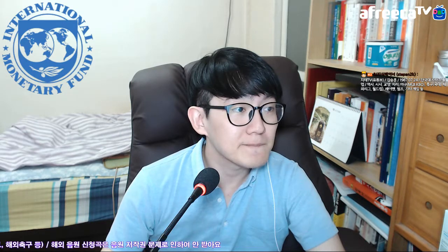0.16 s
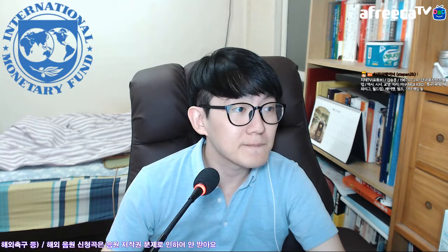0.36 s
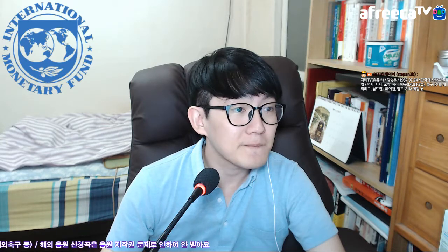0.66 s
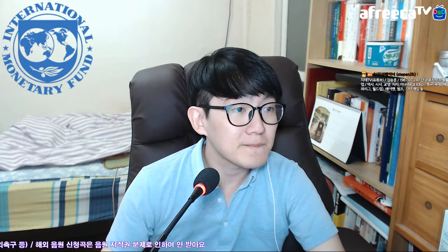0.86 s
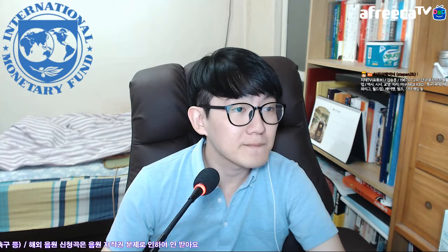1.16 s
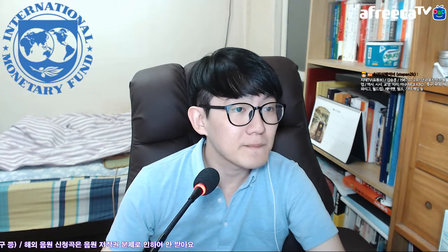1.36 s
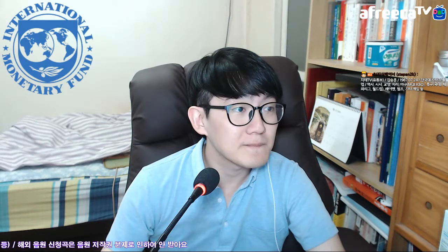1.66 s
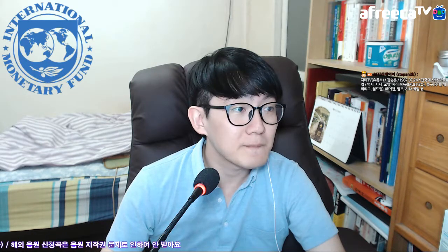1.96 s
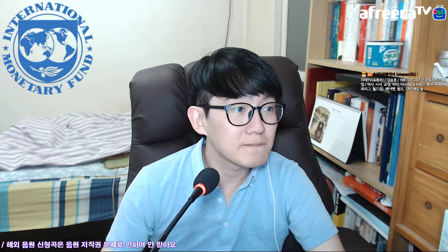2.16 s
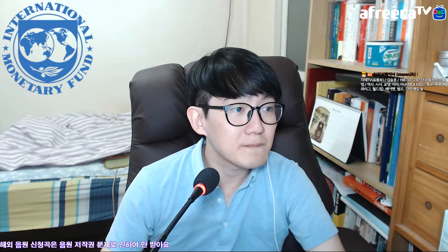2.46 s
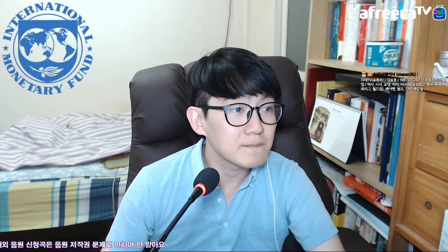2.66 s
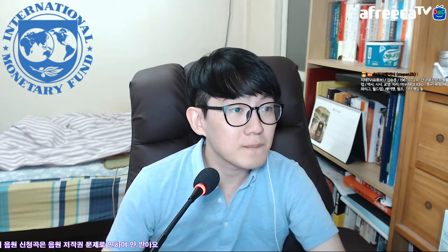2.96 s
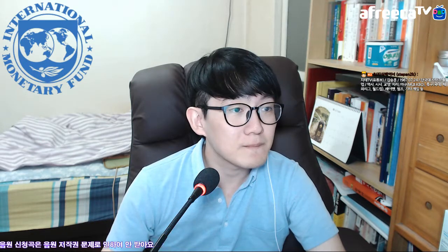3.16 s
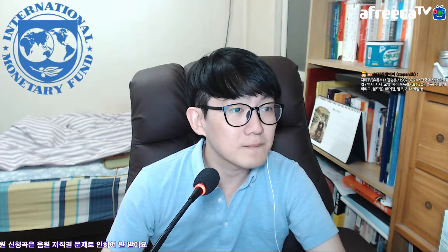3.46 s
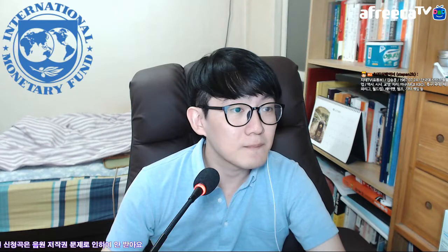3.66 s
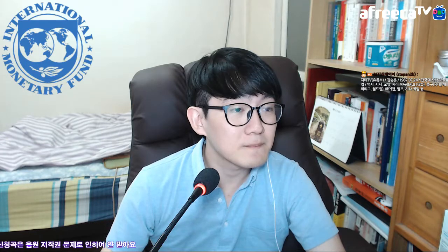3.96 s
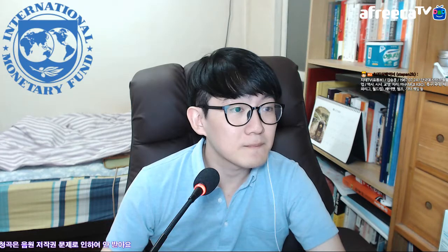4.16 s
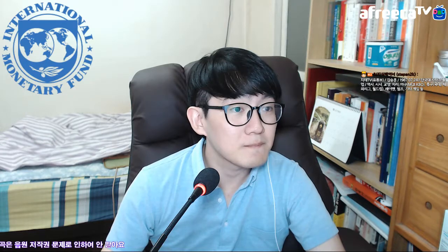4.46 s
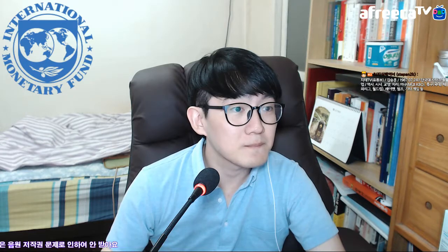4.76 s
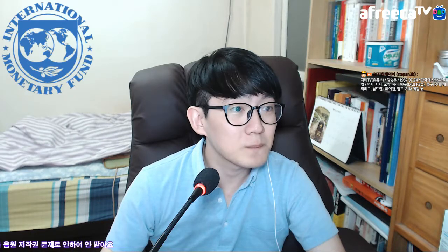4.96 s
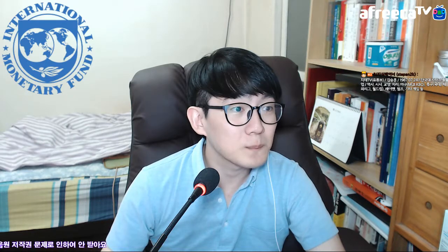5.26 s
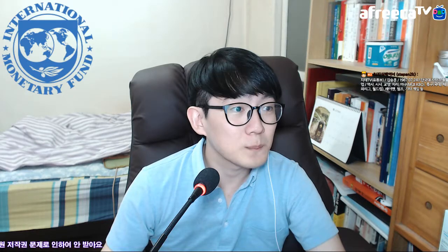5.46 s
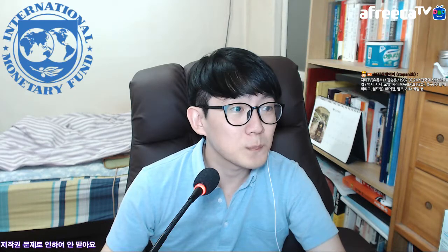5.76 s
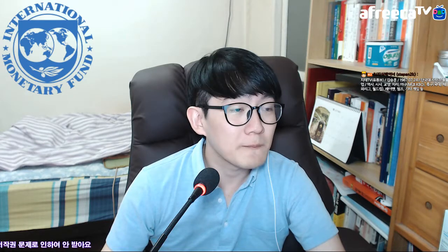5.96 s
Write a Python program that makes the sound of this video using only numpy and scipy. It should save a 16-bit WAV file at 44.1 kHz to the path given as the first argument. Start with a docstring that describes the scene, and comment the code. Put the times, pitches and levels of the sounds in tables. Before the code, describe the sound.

In the first instant, several tiny dry ticks flicker close to a desk microphone. Throughout, mains hum drones deep and smooth, with weak buzzing harmonics. Fan air from a computer rumbles softly underneath, faint steady tones straying slightly within it, and a delicate high coil whine and pale hiss sit far behind. The small furnished room stays otherwise still to the end.

```python
"""Mains hum, leaking into a desk microphone's cable in a quiet small room: a stack of locked partials.
Under it a computer's fans rumble as shaped noise and sing faintly as thin straying tones.
A coil whines on one high straying tone, and the preamplifier hisses as white noise.
A few tiny ticks sound close by in the first moment: short noise bursts through damped resonances."""
import sys
import numpy as np
from scipy import signal
from scipy.fft import rfft, irfft
from scipy.io import wavfile

SR = 44100
rng = np.random.default_rng(int(sys.argv[2]) if len(sys.argv) > 2 else 0)


def generate_wav(sig):
    """Save sig (samples, or channels by samples) to the path in sys.argv[1] as 16-bit PCM at SR."""
    pcm = np.round(np.clip(np.atleast_2d(sig).T, -1, 1) * 32767).astype(np.int16)
    wavfile.write(sys.argv[1], SR, pcm)


N = 269054   # length in samples, about 6.1 s

MAINS_HZ = 59.973
HUM_DB = -37   # rms of the fundamental
ODD_DB, ODD_FALL_DB_PER_OCTAVE = -59, 11.5   # odd overtones, from the third multiple up
EVEN_DB, EVEN_FALL_DB_PER_OCTAVE = -58.5, 12.5   # even overtones, from the second multiple up
# Overtones that stand out of that fall or sink below it: multiple of the mains frequency, lift/dB
UNEVEN_OVERTONES = [(4, 1), (8, -11.5), (11, 5), (13, -5), (18, 6.5)]

# Rumble and rush of the fans' air, before the case lifts it: f/Hz, level/dB per Hz
AIR_SPECTRUM = [(20, -81.5), (35, -85), (52, -72), (70, -78), (90, -84.5), (115, -91.5), (190, -93),
                (270, -99), (450, -99), (880, -101.5), (1400, -103.8), (2400, -107), (4000, -111),
                (10000, -123)]
# Resonances of the computer case: f/Hz, width/Hz, lift/dB
CASE_RESONANCES = [(324, 33, 5), (593, 41, 5), (1094, 210, 3), (2064, 140, 3.5)]
# Singing of the fans: f/Hz, rms level/dB, pitch wander/Hz
FAN_TONES = [(52.6, -67, 0.17), (367.7, -70, 0.41), (630, -90.5, 0.37), (1051, -83, 0.99)]
# Coil whine: f/Hz, rms level/dB, pitch wander/Hz
COIL_TONES = [(3861.8, -82, .7)]

# Tiny ticks: t/s, approximate peak level/dB
TICKS = [(0.0237, -51), (0.0265, -43), (0.0291, -49.5), (0.042, -48), (0.049, -48.5), (0.062, -50)]
# What the ticks ring with: f/Hz, width/Hz, level relative to one another/dB
TICK_MODES = [(2210, 870, 6.5), (3320, 750, 3.5), (4670, 500, -1.5)]
TICK_DECAY_S = 0.0024

HISS_DB = -112.8   # preamplifier, per Hz
CUTOFF_HZ = 15750


def mains_hum(odd_lag=0.86, count=7, size=29):
    """`size` partials locked to the mains: the lowest `count` make a leaning, pointed wave, the rest buzz."""
    turn = 2 * np.pi * MAINS_HZ * np.arange(N) / SR + np.pi / 2
    hum = from_db(HUM_DB) * np.sqrt(2) * np.cos(turn)
    for order in range(2, size + 1):
        if order > count:
            lag = rng.uniform(0, 2 * np.pi)
        elif order % 2:
            lag = odd_lag   # radians; hysteresis in a transformer's iron delays the odd overtones
        else:
            lag = 0
        hum += from_db(overtone_db(order)) * np.sqrt(2) * np.cos(order * turn - lag)
    return hum


def overtone_db(order):
    """Odd and even overtones each fall by about 12 dB an octave, as in a wave with corners."""
    if order % 2:
        level_db = ODD_DB - ODD_FALL_DB_PER_OCTAVE * np.log2(order / 3)
    else:
        level_db = EVEN_DB - EVEN_FALL_DB_PER_OCTAVE * np.log2(order / 2)
    return level_db + sum(lift_db for multiple, lift_db in UNEVEN_OVERTONES if round(multiple) == order)


def fan_air():
    """Smooth turbulence, strongest in the bass, lifted at the resonances of the case."""
    hz = np.maximum(np.arange(N // 2 + 1) * SR / N, 1)
    points_hz, points_db = np.transpose(AIR_SPECTRUM)
    colour_db = np.interp(np.log(hz), np.log(points_hz), points_db)
    for centre, width, lift_db in CASE_RESONANCES:
        colour_db = colour_db + lift_db / (1 + (2 * (hz - centre) / width) ** 2)
    return irfft(rfft(white()) * from_db(colour_db), N)


def fan_singing():
    """Faint fan tones, straying about once a second."""
    return wandering_tones(FAN_TONES, rate=1.15, flutter_db=1.25)


def coil_whine():
    """A thin, high tone from a coil, straying faster than the fans."""
    return wandering_tones(COIL_TONES, rate=2.5, flutter_db=1.0)


def wandering_tones(tones, rate, flutter_db):
    """Thin sines whose pitch and level stray a little."""
    out = np.zeros(N)
    for hz, level_db, wander in tones:
        cycles = np.cumsum(hz + wander * drift(rate)) / SR + rng.random()
        gain = from_db(level_db + flutter_db * drift(rate))
        out += gain * np.sqrt(2) * np.sin(2 * np.pi * cycles)
    return out


def ticks():
    """Each tick is a burst of a few milliseconds through three steep, damped resonances."""
    t = np.arange(N) / SR
    envelope = np.zeros(N)
    for start, peak_db in TICKS:
        envelope += from_db(peak_db) * (t >= start) * np.exp(-np.abs(t - start) / TICK_DECAY_S)
    grain = rng.standard_normal(N)
    ringing = np.zeros(N)
    for hz, width, level_db in TICK_MODES:
        once = resonance(grain, hz, width)
        ringing += from_db(level_db) * resonance(once, hz, width)   # the second pass steepens it
    return envelope * rms_one(ringing) / 2   # a burst peaks at about twice its rms


def preamp_hiss():
    """The preamplifier's noise, equally strong at every frequency."""
    return from_db(HISS_DB) * white()


def from_db(db):
    """Decibels to gain."""
    return 10 ** (np.asarray(db) / 20)


def rms_one(x):
    """Scale to an rms of one."""
    return x / np.sqrt(np.mean(x ** 2) + 1e-20)


def drift(rate):
    """Slow chance with a spread of one, changing about `rate` times a second."""
    step = 40   # samples between the slow values
    r = np.exp(-2 * np.pi * step * rate / SR)
    chance = rng.standard_normal(N // step + 2002)
    slow = signal.lfilter([1], [1, -2 * r, r * r], chance)[2000:]   # drop the filter's settling
    return np.interp(np.arange(N) / step, np.arange(len(slow)), rms_one(slow))


def white():
    """White noise of 0 dB per Hz."""
    return rng.standard_normal(N) * np.sqrt(SR / 2)


def resonance(x, hz, width):
    """Two-pole resonance with a gain of about one at its top."""
    r = np.exp(-np.pi * width / SR)
    feed = (1 - r * r) / 2 * np.array([1, 0, -1])
    return signal.lfilter(feed, [1, -2 * r * np.cos(2 * np.pi * hz / SR), r * r], x)


def scene():
    """The hum and hiss of the electronics, plus the room's faint sounds."""
    electronics = mains_hum() + preamp_hiss()
    fans = fan_air() + fan_singing()
    return (electronics + fans + coil_whine() + ticks())[None]


def record(dry):
    """A steep low-pass cuts the top."""
    low_pass = signal.firwin(601, CUTOFF_HZ, fs=SR, window="blackman")
    return signal.fftconvolve(dry, low_pass[None], mode="same")


dry = scene()
out = record(dry)
generate_wav(out)
```